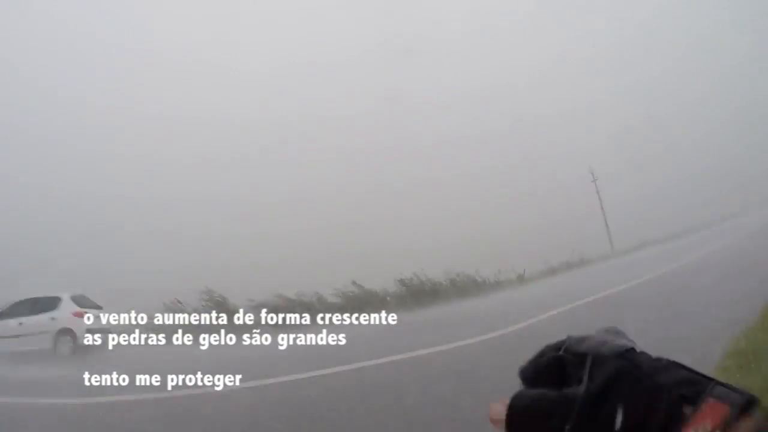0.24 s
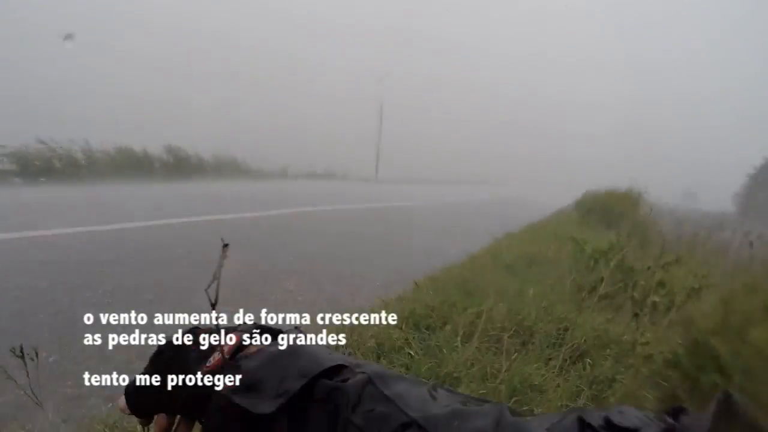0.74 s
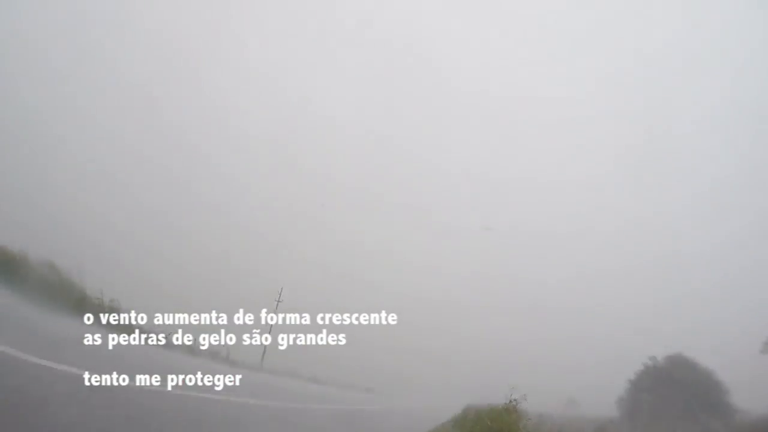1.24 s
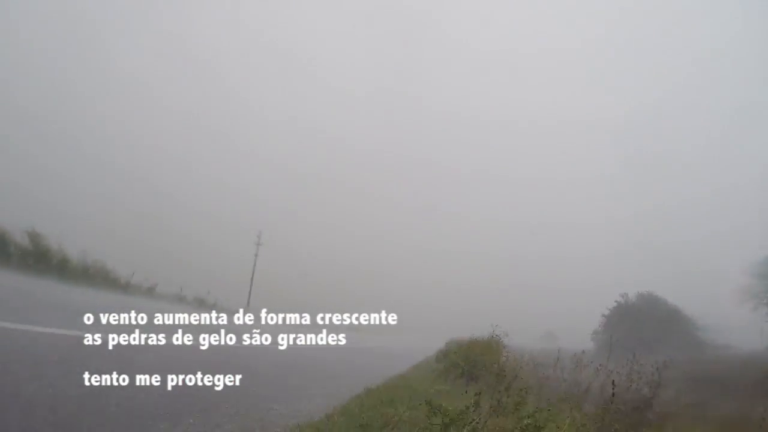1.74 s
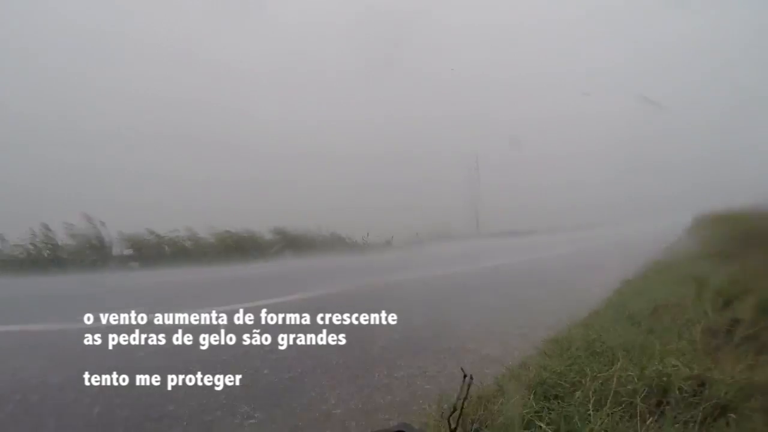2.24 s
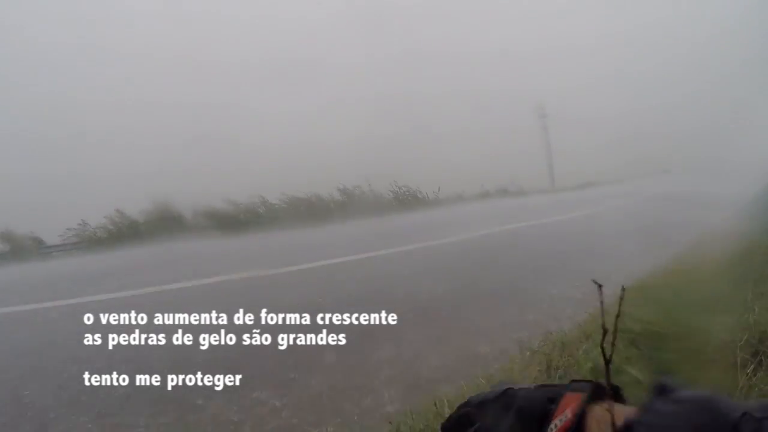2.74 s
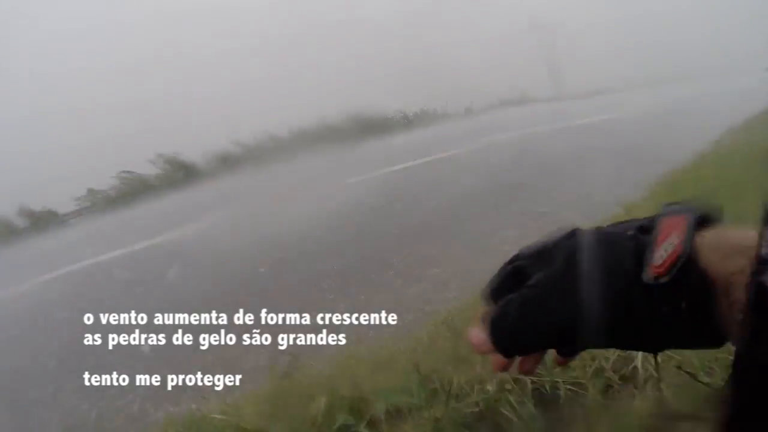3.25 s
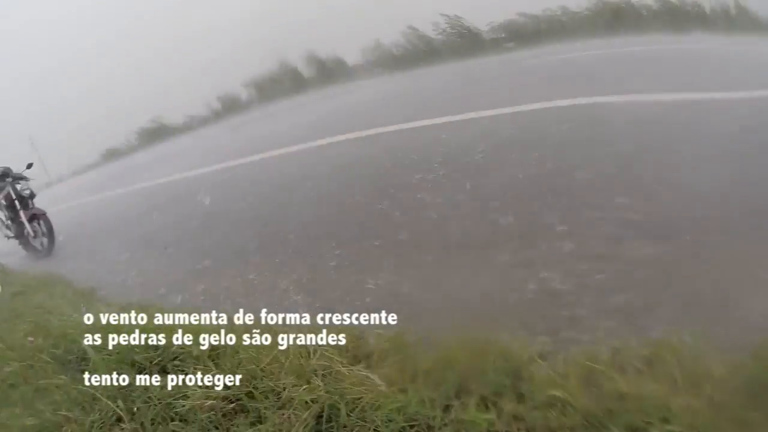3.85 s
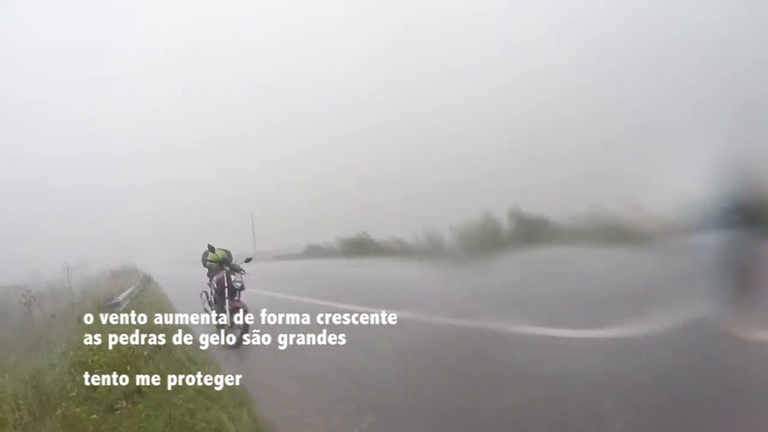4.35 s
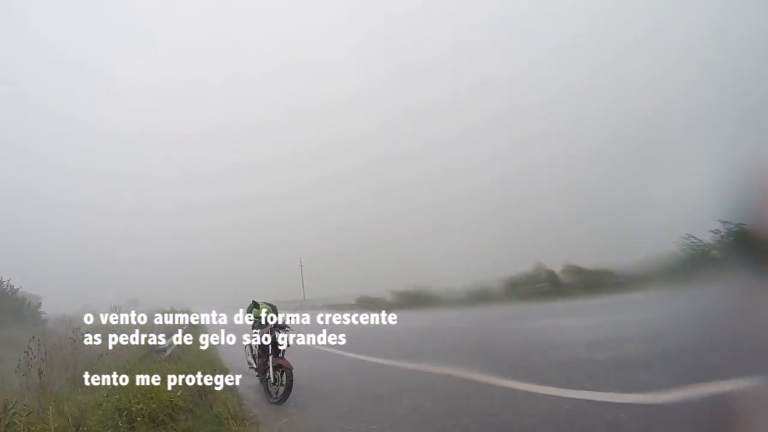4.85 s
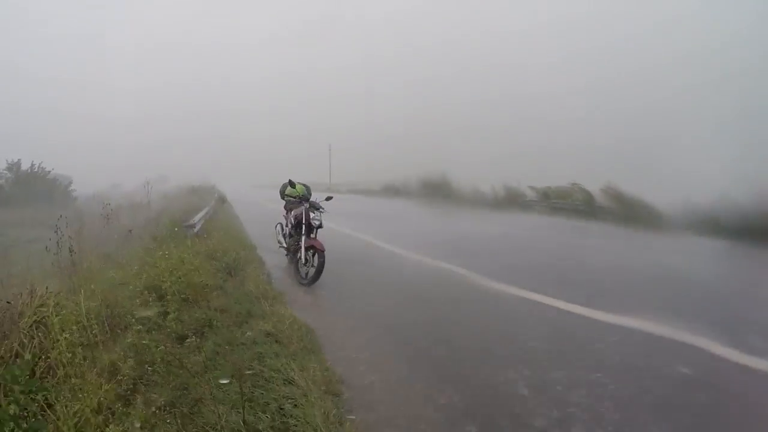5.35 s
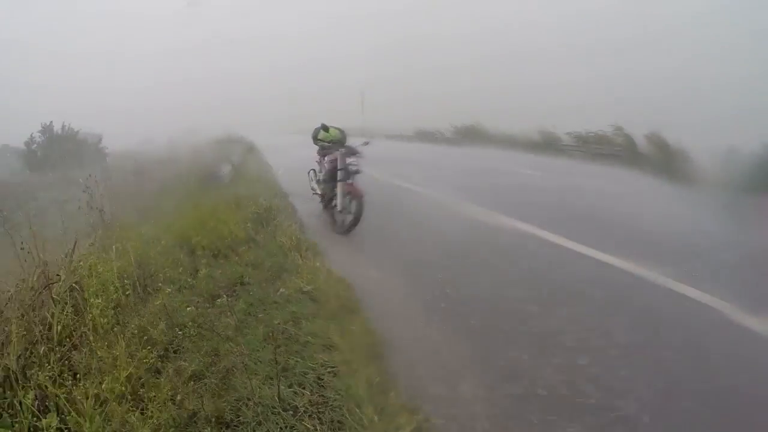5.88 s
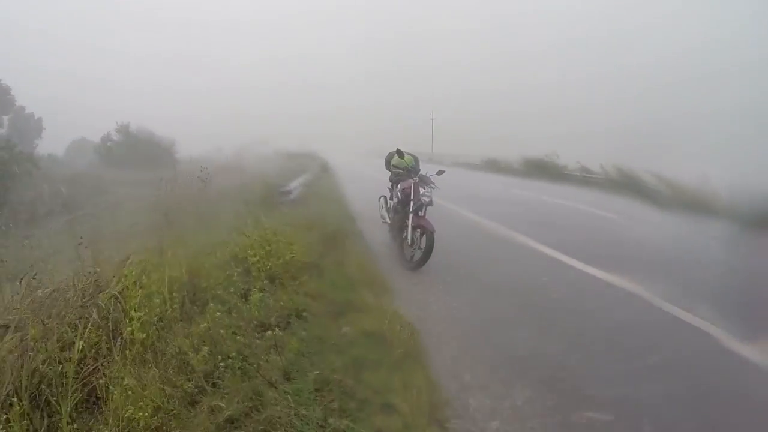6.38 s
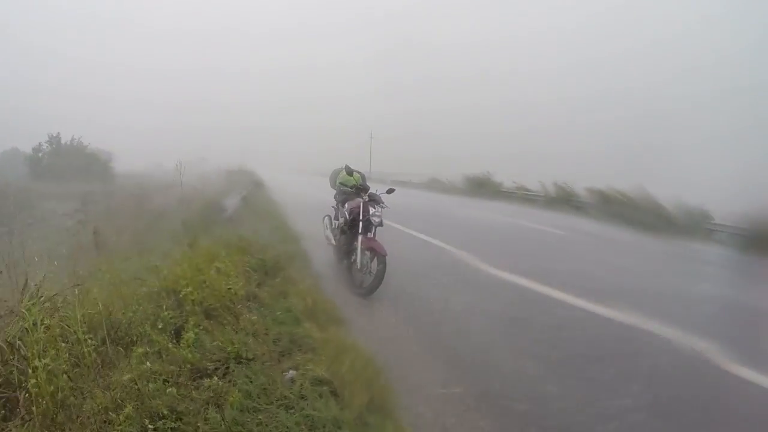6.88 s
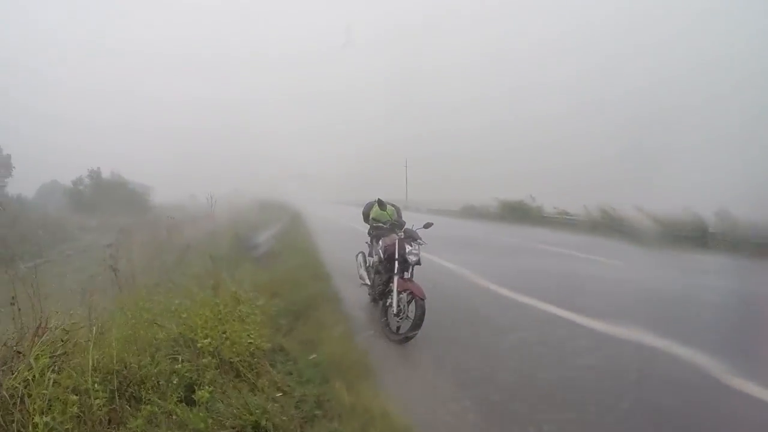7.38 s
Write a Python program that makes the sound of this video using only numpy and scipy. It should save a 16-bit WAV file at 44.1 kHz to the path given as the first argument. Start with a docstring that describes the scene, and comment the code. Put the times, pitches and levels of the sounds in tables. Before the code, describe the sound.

Outdoors on an exposed roadside, a plastic-cased microphone worn on the body is pelted by hail. From 0 to about 5.2 seconds, big stones strike irregularly, often in tight clusters: very short, dry plastic clacks and cracks, some lower and duller, others bright, the hardest distorting around 1.5, 2.3 and 2.6. Tiny ice ticks and raindrops patter between them over hissing spray, light cloth flutter, soft taps on clothing and faint low wind. Hollow, low helmet-like knocks sound near 1.3, 3.1, 3.6, 4.8 and 5.25. After the turn away, hard hits almost vanish and the patter briefly thins. Around 5.9 to 6.1 a wet sleeve swishes past. Wind swells, buffeting and booming, and from about 5.7 taut rain clothes snap and flap violently, strongest around 6 to 6.7, continuing through 7.6 with lighter rain. Sound is close, dry, without echo.

```python
"""Hailstones crack on a plastic microphone housing worn by a motorcyclist; ice pellets and drops patter between.
Each impact sums a dull push, decaying sines for the wall modes and a noise crack; the hardest hits clip.
Hollow knocks are low sines; rain clothes flutter and flap as shaped noise; a sleeve brushes past.
Far spray hisses, wind buffets and booms in the housing; near the end the hits thin out and the wind takes over."""
import sys
import numpy as np
from scipy import signal
from scipy.fft import rfft, irfft, next_fast_len
from scipy.io import wavfile
from scipy.ndimage import map_coordinates

SR = 44100
rng = np.random.default_rng(int(sys.argv[2]) if len(sys.argv) > 2 else 0)


def pcm_store(signal):
    """Save signal as 16-bit PCM."""
    levels = np.round(np.clip(np.atleast_2d(signal), -1, 1) * 32767)
    wavfile.write(sys.argv[1], SR, levels.astype(np.int16).T)


N = 336042

# housing wall modes: nominal_hz, longest_t60_s, share_of_blow_db
WALL_MODES = [(1720, 0.0085, -2), (2700, 0.0053, 1), (4460, 0.0078, -2)]
# wind strength, as the level of the cloth it shakes: time_s, level_db
WIND_STRENGTH = [(0.0, -34.5), (0.46, -30.5), (0.72, -43.5), (0.78, -33.5), (1.38, -32), (1.44, -49),
                 (1.72, -33.5), (1.8, -40), (2.12, -31), (2.45, -37.5), (2.57, -35.5), (3.23, -31.5),
                 (3.33, -38.5), (3.63, -26), (3.71, -40), (3.93, -28.5), (4.11, -38), (4.19, -34),
                 (5.15, -33), (5.19, -44), (5.4, -42), (5.47, -29.5), (5.6, -24.5), (5.63, -46),
                 (5.7, -45.5), (5.74, -28), (6.2, -24), (6.49, -24.5), (6.59, -19), (6.66, -24.5),
                 (7.6, -24.5)]
TURN_S = 5.17  # the rider turns away from the hail
ICE_DB_PER_EXPOSURE_DB = 0.38


def amp(db):
    """Decibels to gain."""
    return 10 ** (np.asarray(db) / 20)


def unit(x):
    """Scale to rms 1."""
    return x / np.sqrt(np.mean(x ** 2) + 1e-20)


def burst(x):
    """Scale each row to the energy of 10 ms at rms 1."""
    energy = np.sum(x ** 2, -1, keepdims=True)
    return x / np.sqrt(energy / (SR * .01) + 1e-20)


def read_curve(rows, times_s):
    """Read a (time_s, value) curve at the given times."""
    return np.interp(times_s, *np.transpose(rows))


def curves(rows):
    """One value per sample for each column after the time."""
    knot_s, *columns = np.transpose(rows)
    return [np.interp(np.arange(N) / SR, knot_s, column) for column in columns]


def wobble(rate_hz):
    """Smooth random curve through rate_hz normal knots a second."""
    knots = rng.standard_normal(int(N * rate_hz / SR) + 4)
    return map_coordinates(knots, [np.arange(N) * rate_hz / SR])


def colour(x, points):
    """Minimum-phase filter with the given (hz, db) shape."""
    n = x.shape[-1]
    m = 2 * next_fast_len(n)
    hz, db = np.transpose(points)
    shape_db = np.interp(np.log(np.fft.rfftfreq(m, 1 / SR) + 1), np.log(hz), db)
    # folding the cepstrum makes the filter causal
    cepstrum = irfft(np.log(amp(shape_db)))
    cepstrum[1:m // 2] *= 2
    cepstrum[m // 2 + 1:] = 0
    response = np.exp(rfft(cepstrum))
    return irfft(rfft(x, m) * response)[..., :n]


def noise(points):
    """Coloured noise of rms 1."""
    return unit(colour(rng.standard_normal(N), points))


def place(times_s, rows):
    """Sum short sounds at their start times."""
    first = np.round(np.asarray(times_s) * SR).astype(int).clip(0)
    index = first[:, None] + np.arange(rows.shape[1])
    return np.bincount(index.ravel(), rows.ravel(), N)[:N]


def hail(count=26):
    """Big stones at set times, and lesser ones at random moments until the rider turns away."""
    # big stones: start_s, level_db, pitch_hz, crack_over_level_db, thud_over_level_db
    big_stones = [(0.0029, -17, 4400, -8.5, -14.5), (0.0739, -28, 1780, -1, -14),
                  (0.1479, -21.5, 3740, -2, -6), (0.202, -15, 1710.0, -6, -10.5),
                  (0.2953, -25.5, 1710, -16, -9), (0.306, -26, 2790.0, 0, -9.5),
                  (0.4518, -23, 2760, -18, -4.5), (0.4589, -27, 4380, 3, -19),
                  (0.4775, -18, 2160.0, 1, -7.5), (0.5332, -17.5, 4470.0, -5, -13.5),
                  (0.5852, -24.5, 2750, -4, -8.5), (0.6102, -17.5, 2750, 2, -8.5),
                  (0.752, -24, 2810.0, -9.5, -24), (0.8125, -28, 2060, -1, -8.5),
                  (0.9228, -20, 2670, -0.5, -10.5), (0.9884, -35.5, 2820, 6, -15),
                  (1.0584, -28, 2900, -6, -19), (1.067, -25, 4480, -3, -20), (1.078, -27, 2510.0, -8, -17),
                  (1.0862, -23.5, 4520.0, 3, -17), (1.101, -21, 3070.0, -2.5, -29),
                  (1.1159, -21.5, 2840, -7, -13), (1.1364, -31.5, 2800.0, -1, -3),
                  (1.1559, -31.5, 2760, -15, -7), (1.225, -33, 2740, 11, -5),
                  (1.2922, -18.5, 1690, -17, -20), (1.3157, -35.5, 2780, 9.5, -23),
                  (1.3551, -17, 2700.0, -13, -12), (1.3703, -17, 2620.0, -6, -6.5),
                  (1.3826, -15.5, 2200, -2, -8.5), (1.4205, -24.5, 4400, -3, -15),
                  (1.4991, -20, 1780, 0, -26), (1.5228, -8.5, 4500, -7.5, -12),
                  (1.5484, -32, 2810.0, -10, -31), (1.5642, -15, 2780, -7.5, -26),
                  (1.576, -34, 2640.0, -5, -15), (1.6178, -22, 4480.0, 1.5, -20),
                  (1.671, -16, 1710.0, -17, -26), (1.6856, -22, 2840, -3, -11),
                  (1.7345, -23.5, 4400, -4, -11), (1.7482, -22, 1780, -8, -12),
                  (1.8777, -31, 2090.0, 3.5, -3), (1.9124, -24, 2720, -8, -8),
                  (2.0144, -34.5, 2620, 6, -20), (2.0342, -27.5, 1770, -2, -11),
                  (2.0846, -19.5, 2540, -6.5, -9.5), (2.1178, -39, 1730.0, 13, -14),
                  (2.1932, -31, 4570.0, -1, -19), (2.2215, -19, 1780, -7, -13),
                  (2.2534, -26, 1580, -27, -11), (2.295, -5.5, 2650, -19.5, -29),
                  (2.408, -34, 2700, 7.5, -16), (2.4392, -21.5, 2620.0, 0, -19),
                  (2.525, -24, 2800, 4.5, -28), (2.5656, -10.5, 2710.0, -18, -50),
                  (2.5891, -15, 2470, -7.5, -12.5), (2.6687, -28, 2470, -10, -10),
                  (2.7261, -22.5, 1700.0, -7.5, -12), (2.7462, -13, 4370, -15, -9),
                  (2.7978, -24, 2650, -0.5, -15), (2.8161, -23, 2680.0, 3.5, -7),
                  (2.8481, -17.5, 2720.0, -29, -15), (2.8565, -20.5, 2710.0, -13, -7.5),
                  (3.0756, -33.5, 2770, 4, -15), (3.1333, -23, 4460.0, -5.5, -11),
                  (3.1813, -12.5, 2970, -10, -19), (3.2247, -26, 1720.0, -0.5, -6),
                  (3.2377, -31.5, 1810, -3, -4), (3.2662, -22, 1690, -25, -18),
                  (3.4285, -26, 2450.0, -20, -16), (3.5069, -22, 2870, -13, -26),
                  (3.5226, -25.5, 1720.0, -0.5, -29), (3.5672, -20, 2840, -2.5, -6),
                  (3.5797, -36.5, 1580.0, 6, 3), (3.6192, -16.5, 3080, -9.5, -18),
                  (3.627, -23.5, 2760, -7, -2.5), (3.7058, -18, 3200, -4, -34),
                  (3.8361, -25, 1720, -30, -21), (3.9447, -21.5, 1690, -1.5, -20),
                  (3.9523, -18, 1670, -13, -18), (3.9642, -24.5, 1910.0, -2, -4.5),
                  (4.0367, -16.5, 1720, 3.5, -10), (4.1603, -26, 1730.0, -0.5, -13),
                  (4.2162, -20.5, 1640, -16.5, 0), (4.2628, -15, 1820, -11.5, -22),
                  (4.3715, -17.5, 2900, -13, -20), (4.4181, -18.5, 2590, -8.5, -15),
                  (4.505, -25.5, 1690, -30, -12), (4.5548, -21, 1790.0, -17, -10),
                  (4.6097, -20, 2850, -13, 3.5), (4.7493, -25, 2780, -13, -11), (4.7986, -27, 1730, 1, -11),
                  (4.8111, -18, 2530, -11, -8), (4.8898, -19.5, 3280, -1.5, -28),
                  (4.919, -27, 2970, 0, -30), (4.9841, -17, 2680, -11, -15.5),
                  (5.026, -28.5, 4270, -0.5, -7.5), (5.0335, -22.5, 3120, -11, -20),
                  (5.0945, -24.5, 2670, -12, -14), (5.146, -16.5, 1630, -10, -8),
                  (5.1599, -12.5, 1690, -30, -10.5), (5.3613, -36, 1760, 3.5, -1)]
    small_db, small_spread_db, small_hz = -32, 2, 2490
    small_crack_db, small_thud_db = -4, -15  # over the stone's level
    start_s = rng.uniform(0, TURN_S, count)
    size, spot, crack, thud = rng.standard_normal((count, 4)).clip(-1.6, 1.6).T
    level_db = small_db + small_spread_db * size + ICE_DB_PER_EXPOSURE_DB * exposure_db(start_s)
    pitch_hz = small_hz * np.exp(0.305 * spot)
    lesser = stones(start_s, level_db, pitch_hz, small_crack_db + 4 * crack, small_thud_db + 4 * thud)
    return stones(*np.transpose(big_stones)) + lesser


def stones(start_s, level_db, pitch_hz, crack_db, thud_db):
    """The nearest wall mode takes the stone's pitch and its level; farther modes answer less."""
    glance_db_per_oct = 7.5
    spill_db_per_db = 0.26  # a hard crack or thud wakes the other modes too
    mode_hz, _, share_db = np.transpose(WALL_MODES)
    ratio = pitch_hz[:, None] / mode_hz
    octaves = np.abs(np.log2(ratio))
    nearest = octaves == octaves.min(1, keepdims=True)
    spill_db = spill_db_per_db * np.maximum(crack_db, thud_db)[:, None]
    other_db = np.minimum(share_db + spill_db - glance_db_per_oct * octaves, 0)
    mode_db = np.where(nearest, 0, other_db)
    levels_db = level_db[:, None] + np.column_stack([thud_db, mode_db, crack_db])
    bend = np.where(nearest, ratio, 1).T[:, :, None]
    blows = strikes(levels_db, detune=.01, crack_t60_s=0.0045, contact_s=0.00039, bend=bend)
    return place(start_s, blows)


def strikes(levels_db, detune, crack_t60_s, contact_s, bend=(1, 1, 1), length=512):
    """One row per impact: a dull push, the ringing wall modes and the crack of crumbling grit."""
    # spectrum of the push: hz, level_db
    thud_shape = [(20, -36), (120, -1), (400, 0.5), (1000, 4.5), (1500, -4.5), (3000, -14.5), (8000, -45)]
    # spectrum of the crack: hz, level_db
    crack_shape = [(200, -23), (1500, -11.5), (3300, 2.5), (5000, -5), (5700, 3.5), (7200, -7),
                   (8400, -6.5), (11000, -12.5), (15000, -21.5), (17000, -99)]
    t = np.arange(length) / SR
    thud_db, *mode_db, crack_db = np.transpose(levels_db)[:, :, None]
    push = burst(colour(1.0 * (t == 0), thud_shape))
    rise = 1 - np.exp(-t / contact_s)
    grit = rng.standard_normal((len(levels_db), length)) * amp(-60 * t / crack_t60_s) * rise
    out = amp(thud_db) * push + amp(crack_db) * burst(colour(grit, crack_shape))
    strongest_db = levels_db.max(1, keepdims=True)
    for (hz, t60_s, _), db, bent in zip(WALL_MODES, mode_db, bend):
        # strong modes ring on, weak ones only click
        life_s = t60_s * np.clip(amp(0.95 * (db - strongest_db)), .35, 1)
        # pitch and polarity depend on where the blow lands
        pitch, side = rng.standard_normal((2, len(levels_db), 1))
        mode_hz = hz * bent * (1 + detune * pitch)
        ring = np.sin(2 * np.pi * mode_hz * t) * amp(-60 * t / life_s)
        out += amp(db) * np.sign(side) * burst(ring * rise)
    return out


def exposure_db(times_s):
    """How hard the shower meets the housing; the rider's turn shelters it."""
    # shower on the housing before the shelter: time_s, level_db
    shower = [(0, -4), (0.45, 2.5), (0.68, -8.5), (1.15, 4), (1.6, 2.5), (2.6, 1), (3.4, -2.5), (4.2, -7.5),
              (5.12, 0.5), (5.25, -4), (5.8, -23), (6.5, 3.5), (7.62, -2)]
    shelter_db = -9
    return read_curve(shower, times_s) + shelter_db * (times_s > TURN_S)


def pellets(count=180):
    """Small ice pellets tick sharply at random moments and barely move the wall."""
    # mean mix over the pellet's level: thud_db, low_mode_db, middle_mode_db, high_mode_db, crack_db
    pellet_mix = [-10, -11, 1.5, -4, 0.5]
    pellet_db, spread_db = -41.5, 4
    start_s = rng.uniform(0, N / SR, count)
    size = rng.standard_normal(count).clip(-1.8, 1.8)
    level_db = pellet_db + spread_db * size + ICE_DB_PER_EXPOSURE_DB * exposure_db(start_s)
    levels_db = level_db[:, None] + pellet_mix + 2.46 * rng.standard_normal((count, 5))
    return place(start_s, strikes(levels_db, detune=0.073, crack_t60_s=0.0024, contact_s=0.000085))


def drops(count=1000):
    """Raindrops strike at random moments, each with its own mix of push, modes and crack."""
    rain_db = -42.5  # patter rms at 0 dB exposure
    start_s = rng.uniform(0, N / SR, count)
    size_db = 5 * rng.standard_normal((count, 1)).clip(-2, 1.4)
    mix_db = 7.4 * rng.standard_normal((count, 5)).clip(-1.6, 1.6)
    levels_db = size_db + [-7.0, -2.0, 2.5, -5.0, 0.0] + mix_db
    blows = strikes(levels_db, detune=0.053, crack_t60_s=0.0038, contact_s=0.00047)
    return unit(place(start_s, blows)) * amp(rain_db + exposure_db(np.arange(N) / SR))


def scatter(x, t60_s, wet_db, count=6):
    """The mount and the rider's body return a short blur; its noise tail changes every 1/8 s."""
    # spectrum of the blur: hz, level_db
    blur_shape = [(200, -2.5), (1000, 3.5), (3000, 3), (5000, -12), (12000, -14.5)]
    t = np.arange(SR // 16) / SR
    decay = amp(-60 * t / t60_s) * (t > .002)
    tails = colour(rng.standard_normal((count, len(t))) * decay, blur_shape)
    tails /= np.linalg.norm(tails, axis=1, keepdims=True)
    pose = np.arange(N) // (SR // 8) % count
    blur = sum(signal.oaconvolve(x * (pose == k), tails[k])[:N] for k in range(count))
    return amp(wet_db) * blur


def knocks():
    """A hollow shell, likely the helmet, rings briefly with one low mode."""
    # knocks: start_s, level_db, pitch_hz
    knock_rows = [(1.309, -29, 594), (3.059, -31, 584), (3.574, -22.5, 600), (4.816, -16, 635),
                  (4.873, -21, 603), (5.254, -22, 660)]
    t = np.arange(SR // 8) / SR
    start_s, level_db, pitch_hz = np.transpose(knock_rows)[:, :, None]
    ring = np.sin(2 * np.pi * pitch_hz * t) * (1 - np.exp(-t / 0.001))
    return place(start_s[:, 0], amp(level_db - 60 * t / 0.052) * ring)


def pats(count=1100):
    """Stones land on the clothes; each patch of fabric gives a short dull note of its own."""
    over_wind_db = -5
    t = np.arange(SR // 40) / SR
    pitch, size = rng.standard_normal((2, count, 1)).clip(-1.7, 1.7)
    pitch_hz = 1550 * np.exp(.33 * pitch)
    envelope = amp(-60 * t / 0.013) * (1 - np.exp(-t / 0.00097))
    ring = np.sin(2 * np.pi * pitch_hz * t) * envelope
    patter = place(rng.uniform(0, N / SR, count), amp(3.5 * size) * ring)
    return amp(curves(WIND_STRENGTH)[0] + over_wind_db) * unit(patter)


def cloth():
    """Rain clothes flutter in uneven puffs; as the wind pulls them taut they flap hard and darker."""
    # lightly fluttering cloth: hz, level_db
    slack_shape = [(100, -17), (430, -25), (600, -8), (900, -2), (1250, -4), (1700, 1), (2200, -0.5),
                   (2750, -4.5), (3500, -7), (4400, -23), (5200, -16), (15000, -41)]
    # cloth in full wind: hz, level_db
    taut_shape = [(100, -13.5), (430, -32.5), (620, -14), (920, -1.5), (1450, 1), (2000, -1.5), (2400, -8),
                  (2750, -5.5), (3700, -19.5), (4400, -21.5), (5000, -37), (5800, -23), (7500, -44),
                  (15000, -53)]
    over_wind_db = -1.5
    puffs = unit(amp(2.3 * wobble(30) + 4.7 * wobble(170) + 3.9 * wobble(480)))
    flutter = amp(curves(WIND_STRENGTH)[0] + over_wind_db) * puffs
    taut = np.interp(np.arange(N) / SR, [3.2, 4.6, 5.75], [.1, .5, .98]).clip(0, 1)
    air = np.hypot(flutter, flaps()) * rng.standard_normal(N)
    slack_cloth = unit(colour(air, slack_shape)) * np.std(air)
    taut_cloth = unit(colour(air, taut_shape)) * np.std(air)
    return (1 - taut) * slack_cloth + taut * taut_cloth


def flaps(count=60):
    """Envelope of the cloth's snaps: the hardest at set times, lighter ones scaled by the wind."""
    # hardest flaps: peak_s, level_db
    hard_flaps = [(5.445, -25), (5.546, -17.5), (5.577, -27), (5.72, -21.5), (5.734, -13), (5.756, -16),
                  (5.773, -15), (5.814, -17.5), (5.865, -22), (5.917, -16), (6.036, -8), (6.069, -13.5),
                  (6.163, -9), (6.222, -15), (6.246, -7), (6.299, -16), (6.44, -10.5), (6.458, -6.5),
                  (6.497, -12), (6.547, -23), (6.566, -12.5), (6.587, -10), (6.61, -16), (6.669, -10.5),
                  (6.728, -13.5), (6.78, -13), (6.911, -9.5), (6.937, -17), (6.984, -14.5), (7.012, -18),
                  (7.044, -13.5), (7.065, -10), (7.249, -13), (7.286, -13), (7.492, -8.5), (7.51, -13),
                  (7.557, -13), (7.6, -14)]
    rise_s, light_over_wind_db, light_spread_db = .0016, 8.5, 2.2
    times_s = rng.uniform(0, N / SR, count)
    size = rng.standard_normal(count).clip(-1.6, 1.6)
    light_db = read_curve(WIND_STRENGTH, times_s) + light_over_wind_db + light_spread_db * size
    peak_s, level_db = np.vstack([hard_flaps, np.column_stack([times_s, light_db])]).T
    u = np.arange(SR // 30) / SR / rise_s
    return place(peak_s - rise_s, amp(level_db[:, None]) * u * np.exp(1 - u))


def sleeve():
    """Wet woven fabric rubs with a grainy swish; each stroke swells quickly and fades more slowly."""
    # strokes of the sleeve: peak_s, level_db
    strokes = [(5.93, -23.5), (6.044, -19)]
    # spectrum of the rub: hz, level_db
    rub_shape = [(800, -11), (2200, 0.5), (2800, 5), (3350, -3), (3950, 3.5), (4500, -5), (5100, -16),
                 (5600, -4), (6400, -15), (7800, -15), (8700, -24), (9700, -17), (11500, -32), (15500, -40)]
    rise_db_per_s, fall_db_per_s = 360, 190
    peak_s, level_db = np.transpose(strokes)[:, :, None]
    t = np.arange(N) / SR - peak_s
    stroke_db = level_db + np.minimum(rise_db_per_s * t, -fall_db_per_s * t)
    rub_db = np.max(stroke_db, axis=0)
    return amp(rub_db + 2.5 * wobble(250)) * noise(rub_shape)


def gust_db():
    """Wind strength over the breeze between gusts, one value per sample."""
    breeze_db = -33
    return curves(WIND_STRENGTH)[0] - breeze_db


def wind():
    """Turbulence buffets the housing and booms in its air space; gusts raise the boom."""
    # wind on the housing: time_s, buffet_db, boom_in_breeze_db
    rumble = [(0.0, -52, -44), (0.88, -56, -44.5), (1.22, -46, -42.5), (1.7, -55, -42.5),
              (2.14, -46.5, -44), (2.43, -56, -45.5), (2.71, -56.5, -42.5), (3.89, -45.5, -49),
              (4.07, -54, -48), (4.97, -45.5, -48.5), (5.59, -44.5, -49), (6.15, -35.5, -45),
              (7.26, -41, -46), (7.6, -40.5, -45)]
    # spectrum of the buffeting: hz, level_db
    buffet_shape = [(15, -27), (33, -23), (43, -9.5), (49, 5), (56, -2.5), (80, -5), (120, -11), (200, -17),
                    (500, -43)]
    # resonance of the air in the housing: hz, level_db
    boom_shape = [(70, -30), (150, -6), (168, 4), (186, -3.5), (218, -1), (260, -12), (420, -18.5),
                  (900, -43.5)]
    boom_db_per_gust_db = 0.86
    buffet_db, boom_db = curves(rumble)
    eddies_db = 1.75 * wobble(15)
    buffet = amp(buffet_db + eddies_db) * noise(buffet_shape)
    boom = amp(boom_db + boom_db_per_gust_db * gust_db() + eddies_db) * noise(boom_shape)
    return buffet + boom


def spray():
    """Countless far drops hiss on the road and the grass, louder in the gusts."""
    # spectrum of the hiss: hz, level_db
    spray_shape = [(300, -25), (1000, -12), (2700, 16), (3600, 6), (4400, 12), (5050, -5.5), (5750, 3.5),
                   (7200, -8), (8300, -16), (11000, -14.5), (13500, -29), (15300, -28), (16000, -40)]
    breeze_hiss_db, hiss_db_per_gust_db = -51.5, 1
    hiss_db = breeze_hiss_db + hiss_db_per_gust_db * gust_db() + 0.53 * wobble(40)
    return amp(hiss_db) * noise(spray_shape)


def scene():
    """Impacts and their blur over cloth, spray and wind."""
    impacts = hail() + pellets() + drops()
    blur = scatter(impacts, t60_s=0.015, wet_db=-18.0)
    body = knocks() + pats() + cloth() + sleeve()
    return (impacts + blur + body + spray() + wind())[None]


def record(dry):
    """The microphone overloads on the hardest hits; the treble rolls off to a band limit."""
    top_hz = 16400
    clipped = dry / (1 + np.abs(dry) ** 8) ** (1 / 8)
    hz = np.fft.rfftfreq(N, 1 / SR)
    rolloff = amp(np.interp(hz, [14500, top_hz], [0, -10])) * (hz < top_hz)
    return irfft(rfft(clipped) * rolloff, N)


dry = scene()
out = record(dry)
pcm_store(out)
```